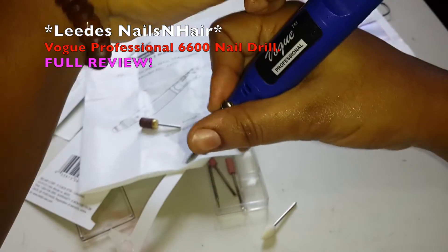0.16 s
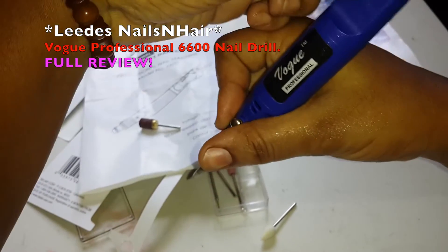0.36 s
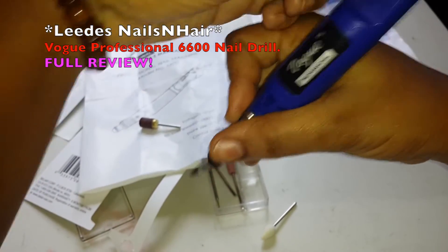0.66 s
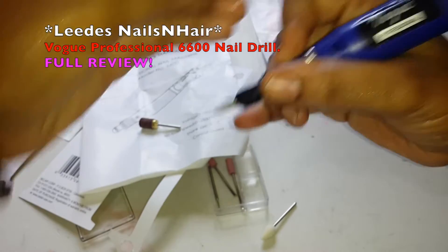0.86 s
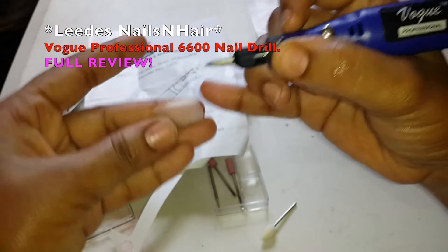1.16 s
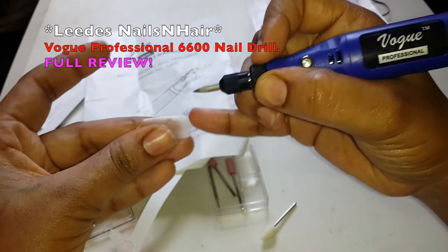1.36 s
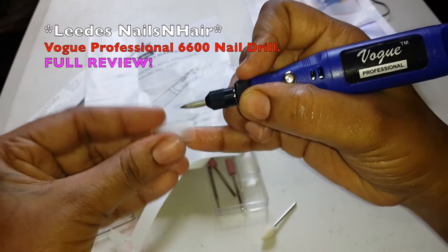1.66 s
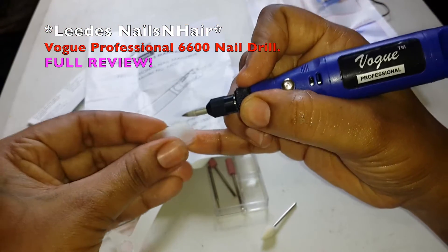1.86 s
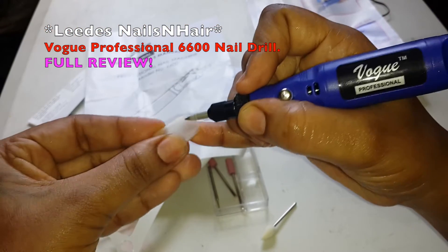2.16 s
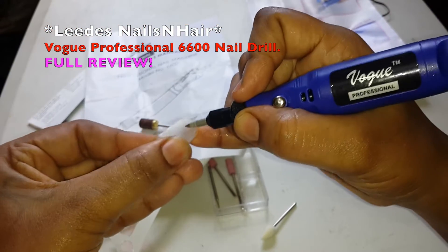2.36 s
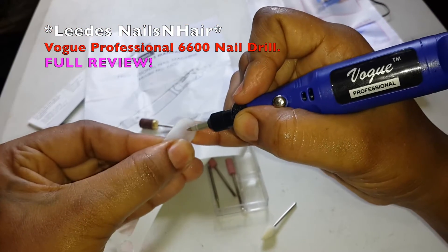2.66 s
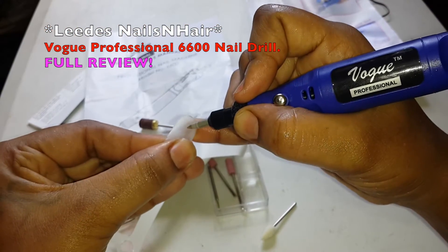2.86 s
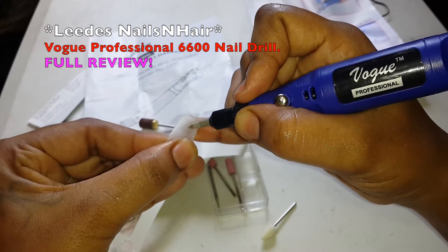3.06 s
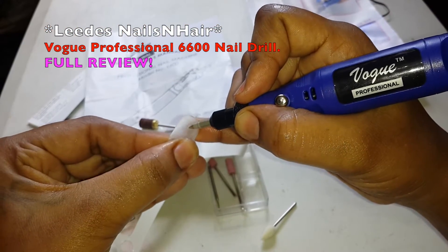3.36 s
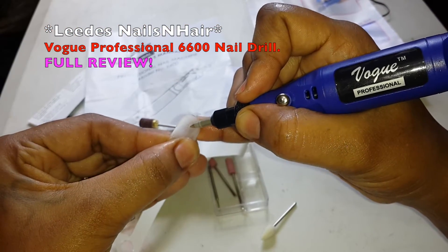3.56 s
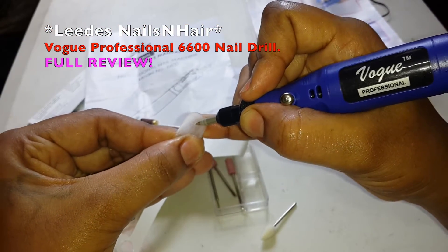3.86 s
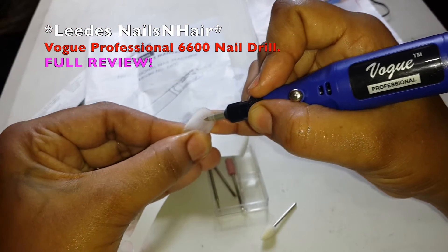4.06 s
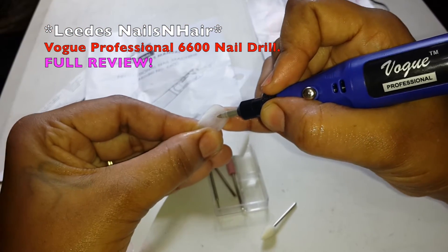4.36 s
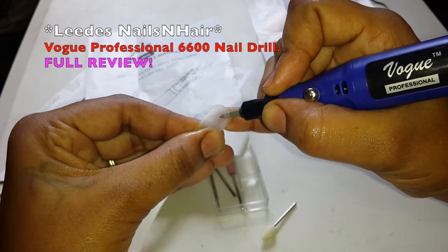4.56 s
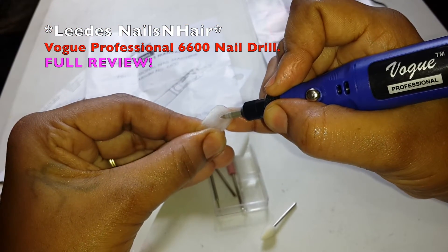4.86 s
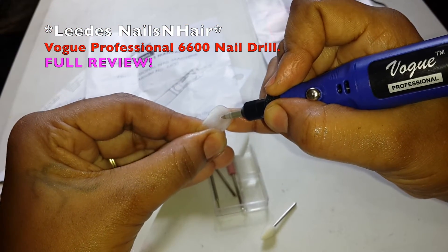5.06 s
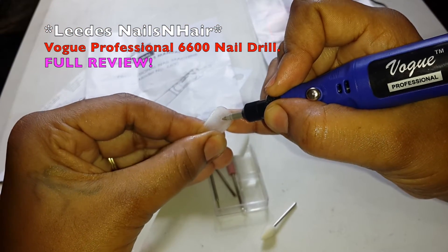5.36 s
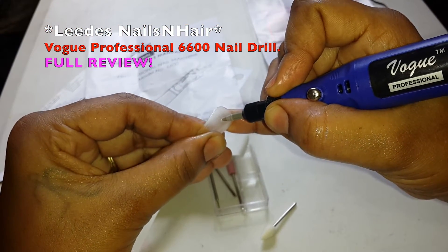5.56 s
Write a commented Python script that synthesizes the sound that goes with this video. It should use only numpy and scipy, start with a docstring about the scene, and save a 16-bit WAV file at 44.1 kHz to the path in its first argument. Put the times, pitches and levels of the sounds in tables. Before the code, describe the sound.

Close stereo sound of a handheld rotary nail file: a lower buzzing idle first, a quick dip and rising whine, then a steady, thin, raspy drone until the end. Bit and collet rattle brightly, sing and chatter in brief bursts, while sliding resonances come faster later on. Dull finger thuds, low air noise and a faint late mains hum sit underneath in a small, dry room.

```python
"""A buzzing rattle and whine at idle, then a rise to about 102 turns a second: a nail drill files a nail tip.
The loose shaft knocks twice a turn; knocks and rubbing ring the casing, motor can, collet and bit.
The play creeps round, sweeping swells down through the resonances; in spells the tip sings or chatters.
Motor lines whine and hum, brushes hiss and hands bump softly; desk and small room answer the drill.
Quiet room air and a faint mains hum lie underneath."""
import sys
import numpy as np
from scipy import signal
from scipy.fft import rfft, irfft, next_fast_len
from scipy.io import wavfile
from scipy.ndimage import uniform_filter1d, map_coordinates

SR = 44100
rng = np.random.default_rng(int(sys.argv[2]) if len(sys.argv) > 2 else 0)


def digitize_waveform(pressure):
    """Quantize a signal to 16-bit integers and store it at the path in sys.argv[1].

    Rows of a 2-D input are taken as channels; values are limited to [-1, 1].
    """
    field = np.atleast_2d(pressure).T
    bounded = np.clip(field, -1, 1)
    quanta = np.round(bounded * 32767).astype(np.int16)
    wavfile.write(sys.argv[1], SR, quanta)


N = 251370

FULL_SPEED = 102  # turns a second
TIP_SLIP = 0.0429  # turns by which a knock at the tip creeps earlier in one cycle of the play
CASE_HISS, TIP_HISS = .55, .75  # noise relative to the repeating part of the rubbing

# resonances of each part: f/Hz, width/Hz, knocked level/dB, rubbed level/dB
CASING = [(1213, 106, -9, -12.5), (1454, 127, 0, 3), (1657, 347, -4, 1), (1895, 320, -10, 1)]
CAN = [(2173, 178, -0.5, 0.5), (2520, 244, -1, 0.5), (2798, 270, -5.5, -3), (3060, 36, -12, -2)]
COLLET = [(3635, 860, -3.5, 3), (4184, 350, 7.5, 6), (4430, 770, 1.5, 4.5), (4997, 590, 3.5, 1),
          (5357, 310, 1, -1)]
BIT = [(5613, 390, -2, 5), (5906, 740, 2, 2.5), (6800, 700, -1, -1.5), (8130, 520, -3, 1),
       (9460, 1380, -11.5, -2.5), (13500, 2800, -30, -18.5)]
# magnetic pull of the rotor on the casing: multiple of the shaft speed, mean level/dB
COGGING = [(14, -18), (16, -32.5), (18, -16.5), (20, -19), (24, -14)]


def rattle(speed, turns):
    """Knocks and rubbing ring the four parts; the harder collet and bit shake, the more knocks stand out."""
    effort = spin_up(speed)
    casing_db, can_db, collet_db, bit_db = shaking(speed, effort)

    def bite(db):
        return amp(0.6 * np.clip(db - np.median(db), -8, 3.5))

    torque = amp(1.2 * effort)  # the motor kicks harder while it speeds up
    cogging = sum(amp(db + 1.1 * wobble(3.98)) * np.sin(2 * np.pi * k * turns) for k, db in COGGING)

    casing = knocks(turns, hardest=0.28, swing_db=11, slip=0.089, scrape=0.04, scrape_s=0.0008)
    casing = 1.15 * torque * casing
    can = knocks(turns, hardest=0.23, swing_db=4.0, slip=0.075, scrape=0.33, scrape_s=0.001)
    can = 1.44 * torque * can
    collet = knocks(turns, hardest=0.17, swing_db=1.5, slip=TIP_SLIP, scrape=0.54, scrape_s=0.0016)
    collet = 0.93 * bite(collet_db) * bouncing(collet, rebound=0.042, gap_ms=0.25)
    bit = knocks(turns, hardest=0.39, swing_db=9, slip=TIP_SLIP, scrape=0.64, scrape_s=0.0016)
    bit = 1.3 * bite(bit_db) * bouncing(bit, rebound=0.09, gap_ms=0.4)

    # the collet rattles less while the bit chatters in it
    seated_db = -1.5 * sum(spell(s, length) for s, length, *_ in CHATTER)
    casing_rub = rubbing(turns, CASE_HISS) + cogging
    parts = [(sounding(casing, casing_rub, CASING, lowest_hz=1144), casing_db + switching()),
             (sounding(can, rubbing(turns, CASE_HISS), CAN, lowest_hz=1580), can_db),
             (sounding(collet, rubbing(turns, TIP_HISS), COLLET, lowest_hz=2530), collet_db + seated_db),
             (sounding(bit, rubbing(turns, TIP_HISS), BIT, lowest_hz=5040), bit_db + switching())]
    return sum(amp(db) * steady(x) for x, db in parts)


# drift of each part with grip and position, before speed and torque act:
# t/s, casing level/dB, motor can level/dB, collet level/dB, bit level/dB
DRIFT = [(0, -39.5, -35, -26, -25.5), (.24, -34, -34, -27.5, -29.5), (.45, -35.5, -33, -28.5, -26.5),
         (1.0, -35, -32, -25, -26), (1.5, -33, -31, -25, -28), (2.0, -35.5, -29, -25.5, -27.5),
         (2.4, -36, -30, -26.5, -29.5), (2.92, -34.5, -30.5, -25.5, -31), (3.3, -36.5, -31, -24.5, -32.5),
         (4.35, -36, -34, -26, -29.5), (4.75, -33.5, -33.5, -27.5, -32), (5.7, -32.5, -34.5, -27.5, -33)]
# answer to the shaft, rows casing, motor can, collet, bit: power of the speed, change at full torque level/dB
RESPONSE = [(1, -1), (1.4, 3), (2.3, -0.5), (2.3, -1.6)]


def shaking(speed, effort):
    """Level of each part in dB: it follows speed and torque, with small chance swings."""
    speed_db = 20 * np.log10(speed / FULL_SPEED)
    return [drift_db + power * speed_db + surge_db * effort + 0.33 * wobble(9)
            for drift_db, (power, surge_db) in zip(curves(DRIFT), RESPONSE)]


def spin_up(speed):
    """Torque spent on gaining speed, 0-1."""
    gain = uniform_filter1d(np.gradient(speed) * SR, size=4000)  # turns a second, per second
    return np.clip(gain / 60, 0, 1) * np.clip((speed - 70) / 15, 0, 1)


def switching():
    """The brief dip as the speed is switched up, in dB."""
    return -3.5 * spell(0.497, 0.089)


# moments when the play shifts to the other side of the shaft, on the whole ever closer: t/s
SHIFTS = [0, .6, .88, 1.27, 1.62, 2.12, 2.53, 2.92, 3.25, 3.55, 3.76, 3.94, 4.11, 4.27, 4.44, 4.56]
BEAT_S = .128  # steady beat of the shifts after the listed ones


def creep():
    """Number of shifts that the play has made so far, rising in straight ramps."""
    moments = np.append(SHIFTS, SHIFTS[-1] + BEAT_S * np.arange(1, 20))
    return np.interp(np.arange(N) / SR, moments, np.arange(len(moments)))


def knocks(turns, hardest, swing_db, slip, scrape, scrape_s):
    """Two knocks a turn creep earlier, swell and fade as the play goes round, each dragging a short scrape."""
    play = creep() / 2
    angle = turns + .0008 * wobble(200)  # no knock lands exactly on time
    blows = np.zeros(N)
    for side in (0, .5):
        age = (play + side) % 1
        size = amp(swing_db * np.cos(2 * np.pi * (age - hardest)))
        blows += pulses(angle + side + slip * age, size, scatter_db=1.0)
    contact = signal.lfilter([1], [1, -np.exp(-1 / (scrape_s * SR))], blows)
    return steady(blows) + scrape * steady(contact * rng.standard_normal(N))


def bouncing(blows, rebound, gap_ms):
    """The hard steel parts rebound twice after each knock."""
    def step(f):
        return rebound * np.exp(-2j * np.pi * f * gap_ms / 1000)

    return steady(filtered(blows, lambda f: 1 + step(f) + step(f) ** 2))


def rubbing(turns, hiss):
    """Brushes and bearing pass the same rough spots every turn; each microphone hears some of its own."""
    def spots(count=380):
        roughness = unit(irfft(np.exp(2j * np.pi * rng.random(count // 2 + 1))))
        return map_coordinates(roughness, [turns % 1 * count], mode='grid-wrap')

    wandering = np.array([wobble(4.003) * spots() + wobble(9) * spots() for _ in range(2)])
    track = spots() + 0.89 * wandering
    noise = rng.standard_normal(N) + 1.3 * rng.standard_normal((2, N))
    contact = 1 + .4 * np.cos(4 * np.pi * turns)  # swells twice a turn, as the shaft knocks
    return steady(contact * (steady(track) + hiss * unit(noise)))


def sounding(knock, rub, modes, lowest_hz):
    """Knocks and rubbing act at different spots, so each favours other resonances of the part."""
    struck = ring(knock, [(c, w, db) for c, w, db, _ in modes], lowest_hz)
    rubbed = ring(rub, [(c, w, db) for c, w, _, db in modes], lowest_hz)
    return struck + rubbed


def ring(x, modes, lowest_hz):
    """x through the resonances of a small part, which radiates little outside their range."""
    def body(f):
        total = 0
        for k, (c, w, db) in enumerate(modes):
            mode = 1j * f * w / (c * c - f * f + 1j * f * w)
            total = total + amp(db) * mode * (-1) ** k  # neighbours ring in opposite sense
        return total

    highest_hz = min(1.25 * modes[-1][0], .45 * SR)
    band = signal.butter(8, lowest_hz, 'high', fs=SR, output='sos')
    roof = signal.butter(4, highest_hz, fs=SR, output='sos')
    return signal.sosfilt(np.vstack([band, roof]), filtered(x, body))


# pressure of the bit on the nail: t/s, pressure (1 = nominal full)
PRESSURE = [(.6, 0.11), (1.0, 0.5), (1.95, 0.4), (2.15, 1.2), (4.45, 1.2), (4.8, 0.85)]
# order in which the resonances swell: f/Hz, lead of the swell (shifts)
SWEEP = [(1500, -.03), (1750, .15), (2050, .38), (2300, .72), (2520, 1.1), (2800, 1.42), (3350, 1.58),
         (3750, 1.9), (4000, 2.5)]
# depth of the swell at pressure 1: f/Hz, share of the amplitude
SWEEP_DEPTH = [(1600, .3), (2300, .25), (3700, .25), (4500, .15), (7000, .1)]


def sweeping(x):
    """As the play creeps round, each resonance swells in its turn, so bright bands slide down in pitch."""
    pressure, = curves(PRESSURE)
    angle = 2 * np.pi * creep()

    def share(wave):
        return filtered(x, lambda f: along(SWEEP_DEPTH, f) * wave(2 * np.pi * along(SWEEP, f)))

    return x + pressure * (np.cos(angle) * share(np.cos) - np.sin(angle) * share(np.sin))


# spells in which the bit chatters in its collet:
# start t/s, length t/s, low ring level/dB, high ring level/dB, pitch of the high ring f/Hz
CHATTER = [(0.32, 0.18, -42, -34, 6600), (0.926, 0.19, -27, -41, 6300), (1.36, 0.056, -27, -25, 5800),
           (2.173, 0.275, -24.5, -30, 6350), (2.446, 0.18, -32, -28.5, 5900),
           (2.615, 0.17, -23.5, -28, 6430), (3.045, 0.081, -24, -29, 6400), (3.36, .1, -44, -28.5, 6500),
           (3.613, 0.12, -32, -26.5, 6500), (3.757, 0.18, -55, -27, 6400), (3.992, 0.098, -50, -26, 6250),
           (4.142, 0.11, -38, -24, 6300), (4.304, 0.14, -36, -24, 6200), (4.47, 0.063, -35, -29.5, 6140)]
# resonances of the low ring: f/Hz, width/Hz, level/dB
LOW_RING = [(4050, 480, 5), (4480, 420, -1), (4900, 400, -6)]
# resonances of the sharp, high ring: multiple of its pitch, width/Hz, level/dB
HIGH_RING = [(.57, 900, -7), (1, 880, 7.5), (1.31, 500, -6), (1.8, 4000, -28)]


def chatter(turns):
    """In spells the bit drums low twice a turn and cracks high, mostly once a turn, its pitch set by the grip."""
    drumming = knocks(turns, hardest=.25, swing_db=2.5, slip=TIP_SLIP, scrape=0.06, scrape_s=0.00075)
    cracks = knocks(turns, hardest=.25, swing_db=26, slip=TIP_SLIP, scrape=.03, scrape_s=.0004)
    low = steady(ring(drumming, LOW_RING, lowest_hz=3550))

    def high(hz):
        return steady(ring(cracks, [(k * hz, w, db) for k, w, db in HIGH_RING], lowest_hz=1950))

    return sum(spell(s, length) * (amp(low_db) * low + amp(high_db) * high(hz))
               for s, length, low_db, high_db, hz in CHATTER)


# spells in which one resonance sings: start t/s, length t/s, f/Hz, width of each filter pass/Hz, level/dB
SINGING = [(0.24, 0.23, 4130, 600, -44), (0.132, 0.233, 2600, 520, -39), (.57, 0.28, 2200, 600, -33),
           (0.622, 0.21, 1330, 350, -37.5), (0.48, 0.22, 3680, 450, -38), (0.65, 0.4, 5530, 500, -36),
           (1.1, 0.55, 5940, 650, -33.5), (1.1, 0.8, 3590, 600, -38.5), (1.65, 0.8, 6020, 500, -36),
           (1.2, 0.95, 7420, 600, -36.5), (2.2, .6, 2740, 300, -35.5), (2.82, .2, 5780, 700, -33.5),
           (2.8, .24, 1430, 300, -37.5), (3.45, 1.23, 3680, 850, -38.5), (4.693, 1.3, 5400, 650, -37.5),
           (4.8, 1.1, 7770, 650, -39)]


def singing(turns):
    """As the grip changes, rubbing and knocking bring out one resonance of casing or tip after another."""
    knocking = knocks(turns, hardest=.25, swing_db=5, slip=TIP_SLIP, scrape=.35, scrape_s=.001)
    drive = .7 * rubbing(turns, TIP_HISS) + knocking

    def narrow(x, hz, width):
        return signal.lfilter(*signal.iirpeak(hz, hz / width, fs=SR), x)

    return sum(amp(db) * spell(s, length, fade=.12) * steady(narrow(narrow(drive, hz, width), hz, width))
               for s, length, hz, width, db in SINGING)


# whine lines: multiple of the shaft speed, idle level/dB, full-speed level/dB, left minus right level/dB
WHINE = [(5, -14, -12.5, 3), (6, -25, -5, -9.5), (7, -14.5, -5.5, -19.5), (8, -14, -17, -16),
         (9, -15, -12, 16.5), (10, -7.5, -10, 4), (12, -18, -0.5, 15), (16, -13.5, -5.5, 26.5),
         (18, -5.5, -2, 17)]
# gain of the whole whine, before the switching dip: t/s, level/dB
WHINE_LEVEL = [(0.0, -53), (1.06, -52.5), (1.17, -49), (1.27, -52), (2.11, -49.5), (2.14, -52.5),
               (3.73, -52), (5.67, -58.5), (5.7, -53)]
# twice-a-turn hum, before its own waver: t/s, level/dB
HUM = [(0, -71), (.45, -67), (.85, -55), (2.4, -55), (3.5, -52.5), (5.7, -48.5)]


def motor(speed, turns):
    """Wavering lines on multiples of the shaft speed; their balance changes with speed and torque."""
    hum_db, = curves(HUM)
    whine_db, = curves(WHINE_LEVEL)
    pressure, = curves(PRESSURE)

    def line(k, waver_db):
        phase = 2 * np.pi * (k * turns + rng.random()) + 0.051 * wobble(5.5)
        flutter_db = 1.6 * min(k / 5, 1) * wobble(28.02)
        return np.sqrt(2) * np.sin(phase) * amp(waver_db * wobble(4.436) + flutter_db)

    up = np.clip((speed - speed[0]) / (FULL_SPEED - speed[0]), 0, 1)
    # the upper lines swell with torque; under pressure they also swell and thin once a shift
    load_db = 2.5 * pressure * (np.cos(2 * np.pi * creep()) - .5)
    surge_db = 7 * spin_up(speed) + load_db
    whine = 0
    for k, idle, full, pan in WHINE:
        level = amp(idle + up * (full - idle) + surge_db * (k > 8))
        whine = whine + level * line(k, waver_db=3.0) * amp(pan * np.array([[.5], [-.5]]))
    return amp(hum_db) * line(2, waver_db=3.7) + amp(whine_db + switching()) * whine


# spectrum of the brush hiss, overall level set below: f/Hz, relative level/dB per Hz
FIZZ = [(2500, -29), (5000, 11), (8000, 8), (10000, 0.5), (12000, -1.5), (15500, -4)]


def brushes(speed):
    """The brushes hiss, louder the faster they slide."""
    hiss = unit(filtered(rng.standard_normal((2, N)), lambda f: amp(along(FIZZ, f))))
    return amp(-32.0 + 0.96 * wobble(2.93)) * (speed / FULL_SPEED) ** 1.34 * hiss


# soft bumps of the hands: t/s, peak level/dB before a 9 dB cut, pitch of the thud f/Hz
BUMPS = [(.12, -42, 256), (0.872, -32.5, 316), (2.089, -46, 510), (2.839, -43, 280), (3.359, -51, 526),
         (4.11, -44, 150), (4.669, -37.5, 171)]


def hands():
    """Fingers shift their grip with dull, short thuds: noise through two low resonances."""
    t = np.arange(N) / SR
    noise = rng.standard_normal(N)

    def thud(hz):
        modes = [(hz, 0.09 * hz, 10), (1.66 * hz, 0.16 * hz, 0)]
        return steady(ring(noise, modes, lowest_hz=.5 * hz))

    # each swell peaks 12 ms after its listed time
    return amp(-9.0) * sum(amp(db) * np.exp(-((t - s - .012) / 0.022) ** 2) * thud(hz)
                           for s, db, hz in BUMPS)


# the drill's radiation toward the two microphones: f/Hz, left minus right level/dB
AIM = [(1100, -5.5), (1450, -7), (2500, 1.5), (3700, -1), (4800, -6.5), (6000, -5), (6900, 2.5),
       (9300, 4.5), (11000, 5.5), (12500, 9), (15500, 11)]
# decay of the small room: f/Hz, t60 t/s
ROOM = [(300, 0.071), (3000, 0.49), (14000, 0.044)]


def space(x, lag_ms, desk_db, desk_t60, room_db):
    """The direct sound reaches the left microphone first; desk, hands and room scatter it."""
    sides = np.array([[1], [-1]])
    direct = filtered(x, lambda f: np.exp(1j * np.pi * f * lag_ms / 1000 * sides))
    echo = amp(desk_db) * tails([(1000, desk_t60)]) + amp(room_db) * tails(ROOM)
    late = np.pad(echo, [(0, 0), (SR // 1000, 0)])  # the echoes start 1 ms later
    pair = direct + signal.fftconvolve(x, late, axes=1)[:, :N]
    return filtered(pair, lambda f: amp(along(AIM, f) * .5 * sides))


def tails(t60s):
    """A decaying noise response of energy 1 for each microphone."""
    hz, t, z = signal.stft(rng.standard_normal((2, SR // 3)), SR, nperseg=128)
    tail = signal.istft(z * amp(-60 * t / along(t60s, hz)[:, None]), SR, nperseg=128)[1]
    return tail / np.linalg.norm(tail, axis=1, keepdims=True)


# spectrum of the room air, overall level set below: f/Hz, relative level/dB per Hz
AIR = [(20, -4), (50, -8), (100, -3.5), (160, 2), (260, 1.5), (400, -3), (900, -3), (2000, -8.5),
       (15000, -51)]
# mains hum: t/s, peak level/dB
MAINS = [(2.25, -89), (2.35, -68), (4.7, -64), (4.9, -60)]


def background():
    """Slowly rising room air, partly shared by both microphones, and a mains hum that sets in partway."""
    t = np.arange(N) / SR
    noise = rng.standard_normal(N) + 0.67 * rng.standard_normal((2, N))
    air = filtered(noise, lambda f: amp(along(AIR, f)))
    air_db = -56 + 0.49 * t + 1.3 * wobble(8)
    mains_db, = curves(MAINS)
    return amp(air_db) * unit(air) + amp(mains_db) * np.sin(2 * np.pi * 50 * t)


def amp(db):
    """Decibels to gain."""
    return 10 ** (np.asarray(db) / 20)


def unit(x):
    """Scale to rms 1."""
    return x / np.sqrt(np.mean(x ** 2) + 1e-20)


def steady(x):
    """Scale to a running rms of about 1."""
    power = uniform_filter1d(np.mean(np.atleast_2d(x) ** 2, axis=0), size=2600)
    return x / np.sqrt(np.abs(uniform_filter1d(power, size=1300)) + 1e-12)


def along(points, hz):
    """(Hz, value) points read on a log axis."""
    f, v = np.transpose(points)
    return np.interp(np.log(hz + 1), np.log(f + 1), v)


def curves(rows):
    """One value per sample for each column after the time."""
    s, *cols = np.transpose(rows)
    return [np.interp(np.arange(N) / SR, s, c) for c in cols]


def wobble(rate):
    """A smooth random curve, rate knots a second."""
    return map_coordinates(rng.standard_normal(int(N * rate / SR) + 4), [np.arange(N) * rate / SR])


def filtered(x, response):
    """x times a complex response of frequency."""
    m = next_fast_len(N + SR // 2)
    return irfft(rfft(x, m) * response(np.fft.rfftfreq(m, 1 / SR)), m)[..., :N]


def pulses(turns, size, scatter_db):
    """One sharp pulse, placed between samples, whenever turns passes a whole number."""
    at = np.interp(np.arange(1, int(turns[-1])), turns, np.arange(N))
    strength = size[at.astype(int)] * amp(scatter_db * rng.standard_normal(len(at)))
    taps = at.astype(int)[:, None] + np.arange(-7, 9)
    shape = np.sinc(taps - at[:, None]) * np.sinc((taps - at[:, None]) / 8)
    return np.bincount(np.clip(taps, 0, N - 1).ravel(), (strength[:, None] * shape).ravel(), N)


def spell(start, length, fade=.04):
    """A gate that fades in and out, half open at its start and end; times in seconds."""
    t = np.arange(N) / SR
    return np.clip(np.minimum(t - start, start + length - t) / fade + .5, 0, 1)


# shaft speed as the drill is turned up: t/s, speed (turns a second)
SPIN_UP = [(0.0, 65.4), (0.458, 65.5), (0.49, 68.0), (0.54, 74.2), (0.594, 86.1), (0.62, 89.7),
           (0.744, 95.4), (0.82, 100.9), (0.86, 102.1)]
# shaft speed as it runs and sags under load: t/s, speed (turns a second)
RUNNING = [(0.9, 102.4), (3.08, 102.4), (3.91, 101.4), (5.5, 101.4), (5.7, 101.2)]


def scene():
    """One slightly unsteady shaft drives every sound of the drill."""
    speed, = curves(SPIN_UP + RUNNING)
    # the speed trembles most at full spin-up torque
    unsteady = 0.000979 * wobble(40) + .0035 * spin_up(speed) * wobble(120.03)
    turns = np.cumsum(speed * (1 + unsteady)) / SR
    drill = sweeping(rattle(speed, turns)) + brushes(speed) + chatter(turns) + singing(turns)
    drill = space(drill, lag_ms=0.033, desk_db=-11, desk_t60=0.019, room_db=-11.0)
    return drill + motor(speed, turns) + hands() + background()


def record(dry):
    """The microphones pass nothing above their band limit of 15.6 kHz."""
    return filtered(dry, lambda hz: hz < 15600)


dry = scene()
out = record(dry)
digitize_waveform(out)
```